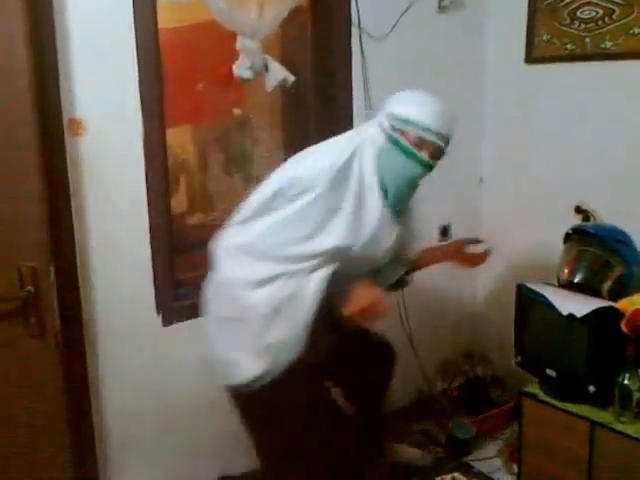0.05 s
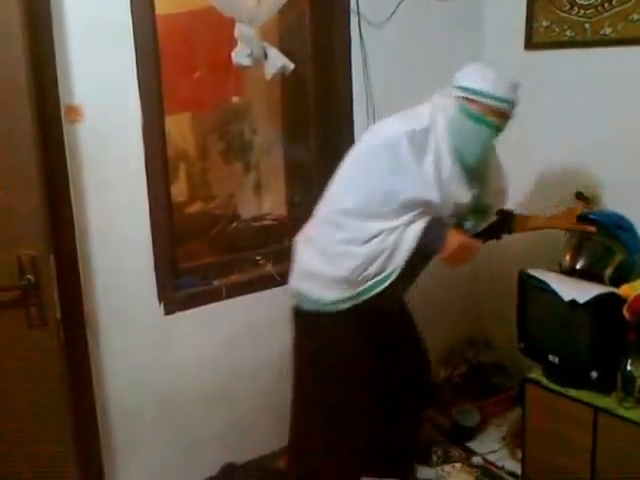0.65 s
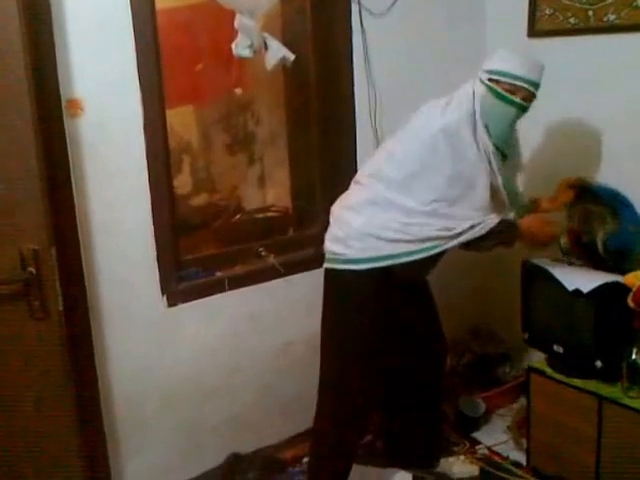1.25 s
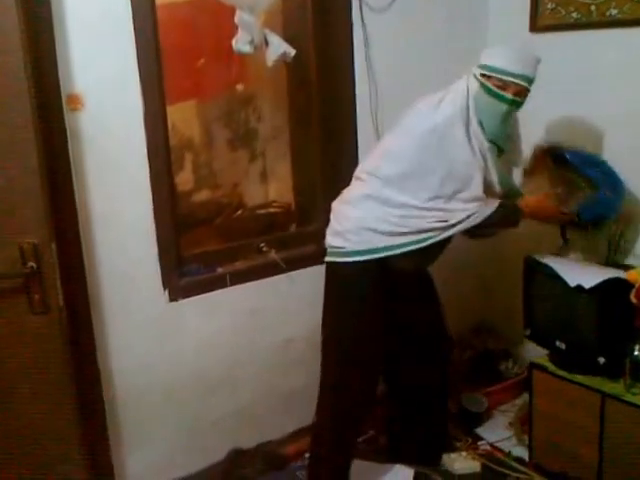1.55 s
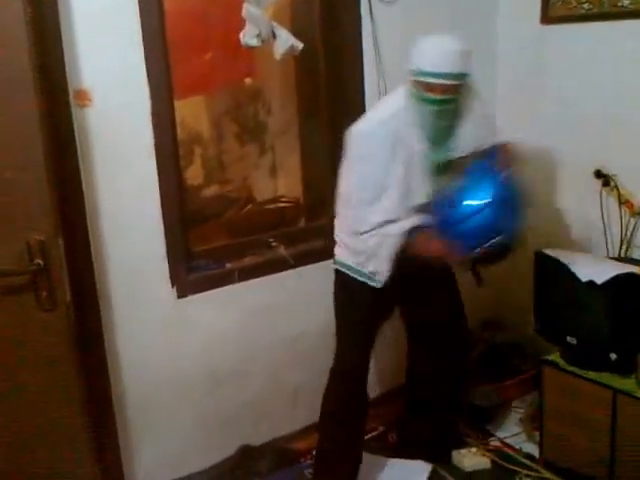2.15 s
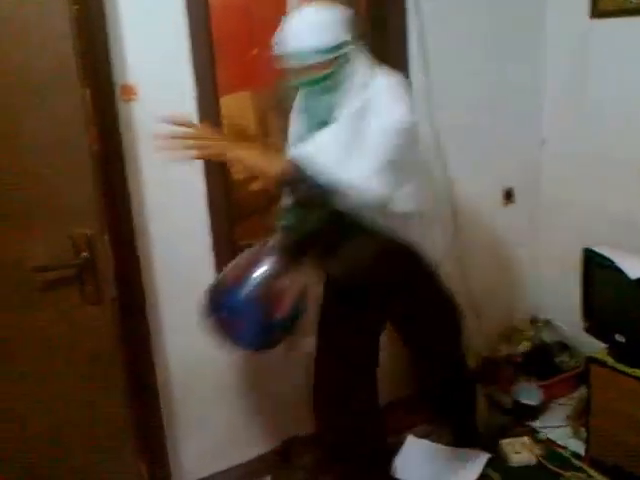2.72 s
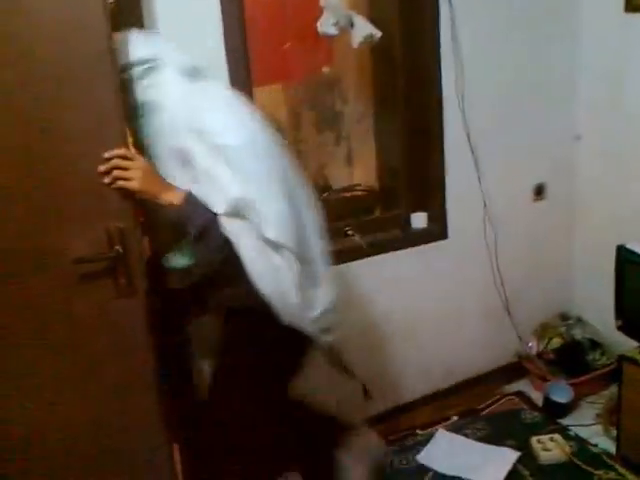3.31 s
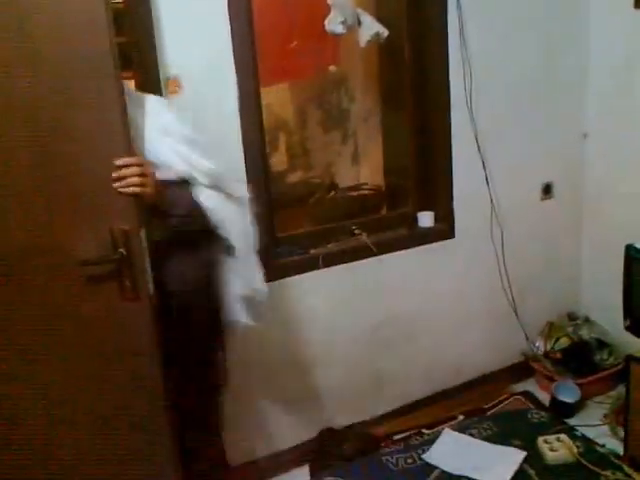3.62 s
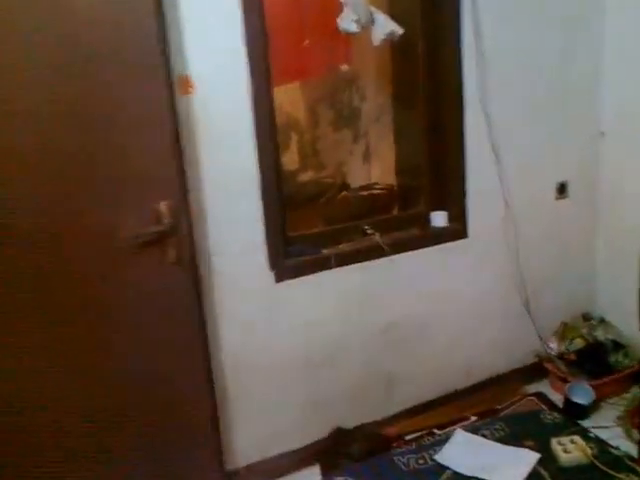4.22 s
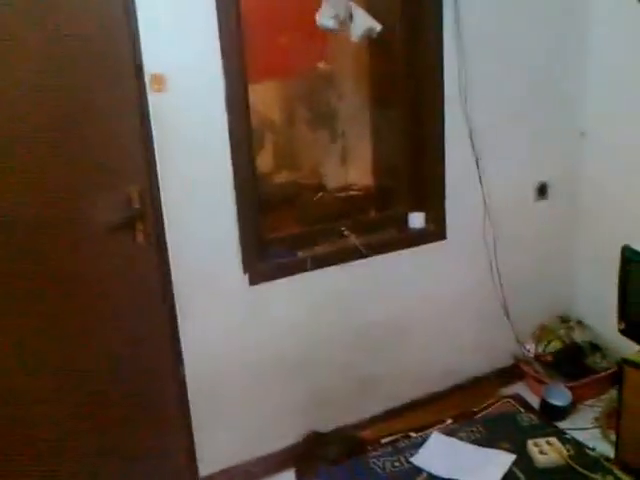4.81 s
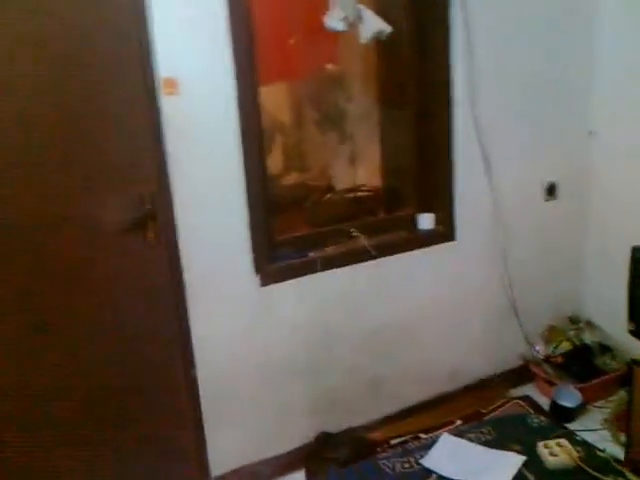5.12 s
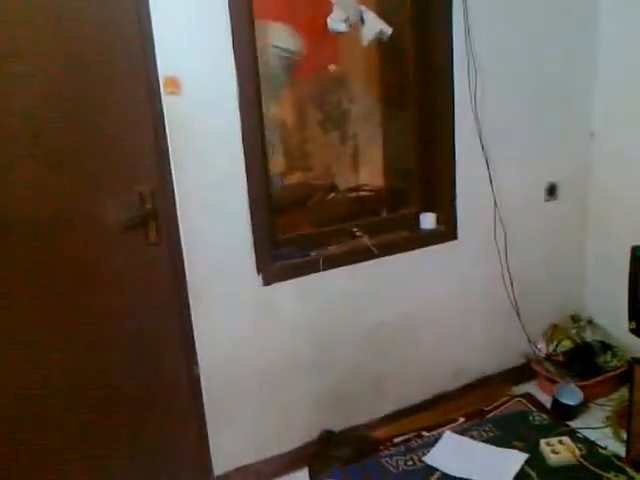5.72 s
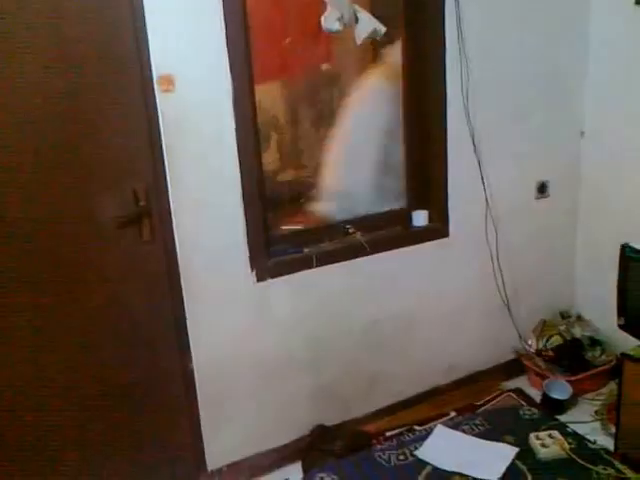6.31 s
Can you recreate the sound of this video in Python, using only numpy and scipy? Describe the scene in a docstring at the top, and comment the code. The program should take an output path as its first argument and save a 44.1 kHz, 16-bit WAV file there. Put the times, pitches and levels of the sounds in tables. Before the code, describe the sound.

Clothing swishes and feet scuff softly over a mat, heard from one microphone in a small, slightly echoing room with a low hiss. A helmet is lifted with light taps and a soft thump, and two faint squeaks slip in among the steps. Then a wooden door closes with a loud clatter and a snap of the latch. A deep, dull thump sounds from beyond the wall, followed by a last light knock.

```python
"""One microphone in a small bare room, over steady hiss and rumble. Someone steps and shuffles on a mat,
clothes rustling; among light knocks and a low thump they pick up a helmet, and two tiny squeaks follow.
Near five seconds a faint whine joins. They slip out through a wooden door: it swings with a low rush
of air, then clatters into its frame as the latch scrapes and snaps.
A dull thump comes from the far side of the wall, then one last knock."""
import sys
import numpy as np
from scipy import signal
from scipy.fft import rfft, irfft, next_fast_len
from scipy.io import wavfile
from scipy.ndimage import uniform_filter1d

SR = 44100
rng = np.random.default_rng(int(sys.argv[2]) if len(sys.argv) > 2 else 0)


def persist_wave(psi):
    """Save psi, clipped to +-1, as 16-bit WAV."""
    counts = np.round(np.clip(psi, -1, 1) * 32767).astype(np.int16)
    wavfile.write(sys.argv[1], SR, np.atleast_2d(counts).T)


N = 288855
T = np.arange(SR) / SR  # seconds within one blow and its tail
SCENE_T = np.arange(N) / SR


def undb(db):
    """Decibels to gain."""
    return 10 ** (np.asarray(db) / 20)


def unit(x):
    """Scale to unit energy."""
    return x / np.sqrt(np.sum(x ** 2))


def level(x, db):
    """Set the rms level of the loudest twentieth of a second."""
    return x * undb(db) / np.sqrt(uniform_filter1d(x ** 2, SR // 20).max())


def add(out, start_s, x):
    """Mix x in at start_s."""
    i = max(int(start_s * SR), 0)
    out[i:i + len(x)] += x[:N - i]


def band(x, low_hz, high_hz, order=2):
    """Band-pass between two edges."""
    edges = np.sort(np.minimum([low_hz, high_hz], .45 * SR)) + [0, 1]
    return signal.sosfilt(signal.butter(order, edges, "band", fs=SR, output="sos"), x + 1e-18)


def colour(x, points):
    """Shape x by (frequency_hz, gain_db) points, at rms 1."""
    hz, db = np.transpose(points)
    size = next_fast_len(N)
    bins_hz = np.maximum(np.fft.rfftfreq(size, 1 / SR), 1)
    gain = undb(np.interp(np.log(bins_hz), np.log(hz), db))
    return unit(irfft(rfft(x, size) * gain, size)[:N]) * np.sqrt(N)


def through(x, response):
    """Pass x through an impulse response."""
    return signal.fftconvolve(x, response)[:len(x)]


def fade(t60_s):
    """Exponential decay, 60 dB in t60_s."""
    return np.exp(-np.log(1000) * T / t60_s)


def ring(modes):
    """Impulse response of a set of damped modes."""
    return unit(sum(undb(db) * fade(t60_s) * np.sin(2 * np.pi * hz * T) for hz, db, t60_s in modes))


def linger(energy, seconds):
    """Energy builds up and leaks away with a time constant."""
    return signal.lfilter([1], [1, -np.exp(-1 / (seconds * SR))], energy + 1e-18)


def contact(length_s, rough_db=4, rise=0.18):
    """Two surfaces touch in a quick run of uneven micro-impacts that swells and dies."""
    grains, size = rng.standard_normal((2, len(T)))
    impacts = grains * undb(rough_db * np.clip(size, -2, 2))
    swell = 1 - np.exp(-T / (rise * length_s))
    return unit(impacts * swell * np.exp(-T / length_s))


# Reverberation of the bare room: frequency_hz, t60_s
ROOM_DECAY = [(100, 0.97), (400, 0.57), (1200, 0.28), (3500, 0.34), (8000, 0.22), (15000, 0.5)]
def in_room(force, wet_db, early_db=4, early_s=0.018):
    """A contact reaches the microphone directly, then off the walls: an early cluster and a tail."""
    hz, t60s = np.transpose(ROOM_DECAY)
    noise = rfft(rng.standard_normal(len(T)))
    log_hz = np.log(np.maximum(np.fft.rfftfreq(len(T), 1 / SR), 1))
    early = undb(2 * early_db) * linger(force ** 2, early_s)
    tail = 0
    for share, t60_s in zip(np.eye(len(hz)), t60s):
        noise_band = irfft(noise * np.interp(log_hz, np.log(hz), share), len(T))
        late = linger(force ** 2, t60_s / (2 * np.log(1000)))
        tail = tail + noise_band * np.sqrt(early + late)
    return force + undb(wet_db) * unit(tail)


# Hiss and rumble at the microphone: frequency_hz, gain_db
HISS_SPECTRUM = [(20, -1.5), (100, 4.5), (200, -5.5), (400, -8), (800, -14), (1600, -19.5), (3200, -21),
                 (6400, -22.5), (12000, -23.5), (15500, -27)]
def room_tone(hiss_db=-59, whine_hz=1211, whine_db=-71, whine_start_s=4.9):
    """Steady hiss and rumble; a faint thin whine joins late."""
    hiss = colour(rng.standard_normal(N), HISS_SPECTRUM)
    whine = np.sin(2 * np.pi * whine_hz * SCENE_T) * np.clip(2 * (SCENE_T - whine_start_s), 0, 1)
    return undb(hiss_db) * hiss + undb(whine_db) * whine


def rubbing(spectrum, grain_db=5.0, flutter_db=1):
    """Fine grains of friction that flutter as folds pass over each other; rms 1."""
    folds = np.interp(np.arange(N), np.linspace(0, N, num=200), rng.standard_normal(200))
    noise, grains = rng.standard_normal((2, N))
    return colour(noise * undb(grain_db * grains + flutter_db * folds), spectrum)


def leaving(outside_s=5.78, decay_s=0.76):
    """Gain that dies away once the person is out of the room."""
    return np.exp(-np.maximum(SCENE_T - outside_s, 0) / decay_s)


# Friction of soles on the mat: frequency_hz, gain_db
SOLE_SPECTRUM = [(40, 3.5), (100, 3), (250, 1.5), (500, -4.5), (800, -8), (1500, -40), (4000, -67)]
# Rise and fall of the sliding: time_s, relative_db
SHUFFLE_CURVE = [(0, -56), (0.3, -81), (0.53, -53.5), (1.1, -66), (1.35, -60), (1.65, -67), (2.1, -63),
                 (2.65, -80), (3.15, -59.5), (4.1, -60), (4.38, -53.5), (4.7, -60), (5.4, -58)]
def shuffle(gain_db=1):
    """Soles slide over the mat with a low rub."""
    curve_db = np.interp(SCENE_T, *np.transpose(SHUFFLE_CURVE))
    return rubbing(SOLE_SPECTRUM) * undb(curve_db + gain_db) * leaving()


# Friction of cloth: frequency_hz, gain_db
CLOTH_SPECTRUM = [(500, 0), (950, -0.5), (1800, 1.5), (3500, -3.5), (6000, -9.5), (10000, -17),
                  (16000, -23)]
# Sweeps of arm and robe: peak_s, relative_db, swell_s
CLOTH_SWEEPS = [(0.51, -52.5, 0.041), (0.756, -53.5, 0.066), (0.96, -55.5, 0.045), (1.11, -55.5, .07),
                (1.283, -55.5, 0.059), (1.52, -59.5, .13), (1.84, -60, 0.13), (2.08, -55.5, 0.079),
                (2.25, -54.5, 0.12), (2.933, -61, 0.079), (3.243, -52.5, 0.11), (3.47, -51.5, 0.068),
                (3.8, -53.5, 0.13), (4.342, -55.5, 0.081), (4.49, -54, 0.13), (4.902, -57.5, 0.054),
                (5.053, -60.5, 0.067), (5.29, -58.5, 0.021)]
def clothes(gain_db=0.5, stir_db=-67, release_ratio=0.95):
    """Cloth rubs on cloth, swelling with each sweep and still stirring in between."""
    power = undb(stir_db) ** 2
    for peak_s, db, swell_s in CLOTH_SWEEPS:
        spread_s = swell_s * np.where(SCENE_T < peak_s, 1, release_ratio)
        from_peak = np.clip((SCENE_T - peak_s) / spread_s, -20, 20)
        power = power + undb(db) ** 2 / np.cosh(from_peak) ** 2
    return rubbing(CLOTH_SPECTRUM) * np.sqrt(power) * undb(gain_db) * leaving()


def knock(db, low_hz, high_hz, length_s, modes, wet_db, crisp_db, ring_db, crisp_top_hz=6000):
    """A small, crisp-edged contact; size and softness set its band, and a nearby surface rings along."""
    surface = ring(modes)
    surface = surface * undb(ring_db) / np.abs(rfft(surface)).max()  # ring_db at the strongest mode
    touch = in_room(contact(length_s), wet_db)
    edge = unit(band(touch, 300, crisp_top_hz, order=1))
    sound = unit(band(touch, low_hz, high_hz)) + undb(crisp_db) * edge
    return level(sound + through(sound, surface), db)


# Ring of the floor underfoot: pitch_hz, gain_db, t60_s
FLOOR_RING = [(307, 3, 0.32), (405, -6.5, .2), (472, -5, 0.32)]
# Steps about the room: start_s, scuff_db, scuff_top_hz, weight_db
SCUFFED_STEPS = [(0.028, -40.5, 1730, -43.5), (0.660, -44.5, 2270, -45.5), (2.874, -51.5, 1780, -58.5),
                 (3.772, -50, 1810, -55), (4.318, -52, 1090, -48.5)]
# Soft treads with no scuff: start_s, level_db
SOFT_TREADS = [(0.002, -46), (3.391, -59.5), (3.722, -52.5), (3.950, -55), (5.177, -58.5)]
def footsteps(sole_lag_s=.028):
    """The foot scuffs the mat, then the sole lands with a duller pat; both ring the floor."""
    out = np.zeros(N)
    scuff = dict(low_hz=407, length_s=.022, modes=FLOOR_RING, ring_db=11.5)
    sole = dict(low_hz=236, high_hz=550, length_s=0.0074, modes=FLOOR_RING, ring_db=1)
    for start_s, scuff_db, top_hz, weight_db in SCUFFED_STEPS:
        add(out, start_s, knock(scuff_db, high_hz=top_hz, wet_db=9.5, crisp_db=-20.5, **scuff))
        add(out, start_s + sole_lag_s, knock(weight_db, wet_db=4.5, crisp_db=-14, **sole))
    for start_s, db in SOFT_TREADS:
        add(out, start_s, knock(db, wet_db=6.5, crisp_db=-16, **sole))
    return out


# Ring of the door panel, also heard in thumps and door: pitch_hz, gain_db, t60_s
PANEL_RING = [(313, -12.5, 0.37), (386.7, -3, 0.37), (452.5, -3, 0.25), (572, -2, 0.1), (715, -2, 0.36),
              (941, 0.5, 0.22), (1170, -8, 0.35), (1323, -5.5, 0.26), (1417, -6, 0.24), (2030, 8.5, 0.092),
              (2700, -19, .13)]
# Light knocks of hands, helmet and door: start_s, level_db, centre_hz, contact_s
LIGHT_KNOCKS = [(0.313, -63, 1080, 0.0031), (0.509, -50, 2330, 0.0097), (0.649, -51.5, 1600, 0.016),
                (0.796, -47.5, 5000, .003), (1.797, -53.5, 2850, 0.0056), (1.801, -46.5, 840, 0.0025),
                (1.859, -56.5, 1960, 0.004), (2.134, -46.5, 2970, .0046), (2.152, -47.5, 1740, 0.003),
                (2.271, -48, 1980, 0.01), (3.205, -47, 1530, 0.0077), (3.245, -50.5, 1110, 0.056),
                (5.835, -46.5, 1080, 0.0098), (6.392, -51.5, 960, 0.02)]
def taps(edge_ratio=1.583):
    """Hard things touch lightly, each in a band around its own centre; the door panel rings along."""
    out = np.zeros(N)
    for start_s, db, centre_hz, contact_s in LIGHT_KNOCKS:
        tap = knock(db, centre_hz / edge_ratio, centre_hz * edge_ratio, contact_s, PANEL_RING,
                    wet_db=5, crisp_db=-13.5, ring_db=0, crisp_top_hz=7000)
        add(out, start_s, tap)
    return out


# Low modes of door leaf and floor: pitch_ratio, gain_db, t60_s
BOOM_RING = [(.7, -33, 0.18), (.85, 3.5, 0.32), (1.0, 5.5, 0.55), (1.28, -2.5, .34), (2.25, -27, 0.42)]
# Thumps through floor and wall: start_s, level_db, pitch_hz, rattle_gain_db, rattle_top_hz, sway_gain_db
DULL_THUMPS = [(1.248, -46, 82.2, 2, 270, -20), (1.273, -43.5, 79, -9, 323, -13),
               (6.104, -33, 101.7, -14, 590, -11), (6.125, -29, 100.2, -14, 393, -4.5),
               (6.175, -37.5, 101.8, -9.5, 325, 5)]
def thumps(wood_db=-8, push_s=0.0033, sway_hz=29.1, sway_t60_s=1):
    """A soft push booms in the low modes, sways the leaf and rattles the wood a little."""
    out = np.zeros(N)
    push = np.sin(np.pi * np.minimum(T / push_s, 1))
    sway = np.sin(2 * np.pi * sway_hz * T) * fade(sway_t60_s)
    for start_s, db, pitch_hz, rattle_db, top_hz, sway_db in DULL_THUMPS:
        boom = through(push, ring(np.array(BOOM_RING) * [pitch_hz, 1, 1]))
        force = band(in_room(contact(length_s=0.0077), wet_db=9.3), 50, top_hz, order=3)
        rattle = unit(force) + undb(wood_db) * unit(through(force, ring(PANEL_RING)))
        add(out, start_s, level(boom, db) + level(sway, db + sway_db) + level(rattle, db + rattle_db))
    return out


# Two tiny squeaks, each of two slips: peak_s, level_db, pitch_hz, half_length_s
SQUEAK_SLIPS = [(2.424, -58.5, 4860, 0.0061), (2.43, -64, 4890, 0.031), (3.094, -60.5, 4930, 0.015),
                (3.121, -49.5, 4843, 0.016)]
def squeaks(waver=0.016, wet_db=-4, rub_db=-9):
    """A smooth surface sticks and slips: one high, unsteady tone in a little rubbing noise."""
    out = np.zeros(N)
    impulse = 1. * (T == 0)
    for peak_s, db, pitch_hz, half_s in SQUEAK_SLIPS:
        drift = unit(band(rng.standard_normal(len(T)), 30, 400)) * np.sqrt(len(T))
        tone = unit(np.sin(2 * np.pi * np.cumsum(pitch_hz * (1 + waver * drift)) / SR))
        rub = unit(band(rng.standard_normal(len(T)), 0.75 * pitch_hz, 1.23 * pitch_hz, order=1))
        slip = (tone + undb(rub_db) * rub) * np.exp(-(T / half_s - np.pi) ** 2)
        add(out, peak_s - np.pi * half_s, level(through(slip, in_room(impulse, wet_db)), db))
    return out


# Swing (first two rows) and clatter, from inside: start_s, level_db, brightness_hz, length_s, push_db
DOOR_CLOSING = [(5.326, -51.5, 450, 0.0026, -54), (5.386, -64, 394, .02, -56),
                (5.485, -43, 586, 0.008, -47.5), (5.572, -47, 650, 0.0047, -39.5),
                (5.597, -37.5, 910, 0.005, -43), (5.625, -46.5, 860, 0.01, -65),
                (5.642, -34.5, 2650, 0.0064, -63), (5.654, -28.5, 876, 0.01, -33.5),
                (5.709, -34.5, 443, 0.009, -37.5)]
def door(ring_db=-4.5, wet_db=1, wood_low_hz=370, crack_db=-14, push_top_hz=120):
    """The door swings with a low rush of air, then clatters into its frame, ringing the panel."""
    out, panel = np.zeros(N), ring(PANEL_RING)
    for start_s, db, bright_hz, length_s, push_db in DOOR_CLOSING:
        burst = in_room(contact(length_s), wet_db)
        wood = unit(band(burst, wood_low_hz, bright_hz))
        crack = unit(band(burst, bright_hz, 3 * bright_hz, order=1))
        tone = unit(band(panel, 110, bright_hz, order=1))
        add(out, start_s, level(wood + undb(crack_db) * crack + undb(ring_db) * tone, db))
        push = band(in_room(contact(length_s=0.015), wet_db=-4.5), 18, push_top_hz)
        add(out, start_s, level(push, push_db))
    return out


# Ring of the bolt and its plate: pitch_hz, gain_db, t60_s
BOLT_RING = [(3840, -5, 0.01), (7000, -6, 0.0073), (8060, -3, 0.0062), (8750, -7, 0.011), (11300, -9, .004)]
# Scrapes and snaps of the bolt, with one dull wooden knock (third row):
# start_s, level_db, low_hz, high_hz, contact_s, wet_db, ring_db
LATCHING_CONTACTS = [(5.425, -47, 1500, 7000, 0.0073, 1, 1), (5.431, -36.5, 424, 2770, 0.0075, -0.5, -9.5),
                     (5.447, -38.5, 360, 740, 0.013, 0.5, -12), (5.4825, -36, 1100, 5040, 0.00052, -8, -7),
                     (5.584, -51.5, 3400, 8700, 0.0033, 10, -20), (5.63, -43, 1800, 7000, 0.0095, 7, -8),
                     (5.640, -34.5, 1640, 5000, 0.003, 10, -13), (5.838, -55.5, 2000, 5300, 0.0069, 8, -23)]
def latch():
    """The bolt grinds over its plate and snaps, with one dull wooden knock; the metal rings briefly."""
    out, metal = np.zeros(N), ring(BOLT_RING)
    for start_s, db, low_hz, high_hz, contact_s, wet_db, ring_db in LATCHING_CONTACTS:
        touch = in_room(contact(contact_s), wet_db)
        body = unit(band(touch, low_hz, high_hz))
        ping = unit(through(touch, metal))
        add(out, start_s, level(body + undb(ring_db) * ping, db))
    return out


def scene():
    """All sources at one microphone inside the room."""
    mono = room_tone() + shuffle() + clothes() + footsteps() + taps()
    mono += thumps() + squeaks() + door() + latch()
    return mono[None]


def record(dry, top_hz=15850):
    """The recorder cuts the highest treble steeply."""
    return signal.sosfilt(signal.ellip(10, .2, 70, top_hz, fs=SR, output="sos"), dry)


dry = scene()
out = record(dry)
persist_wave(out)
```